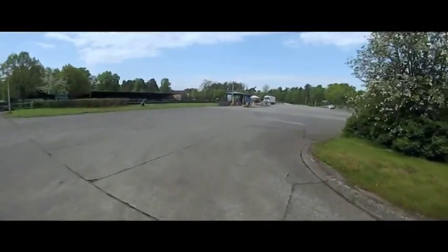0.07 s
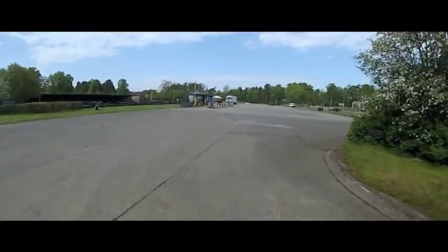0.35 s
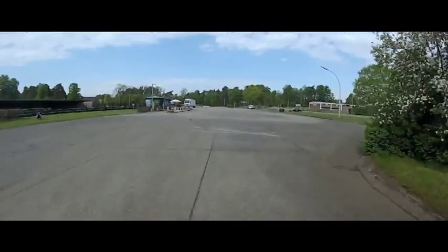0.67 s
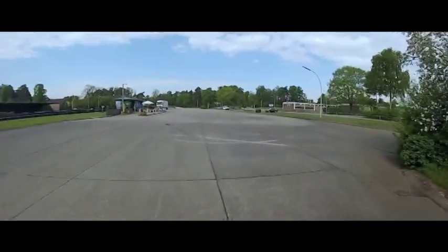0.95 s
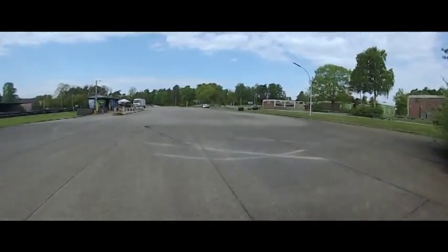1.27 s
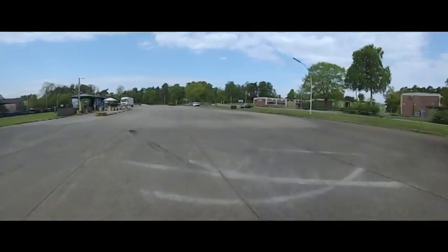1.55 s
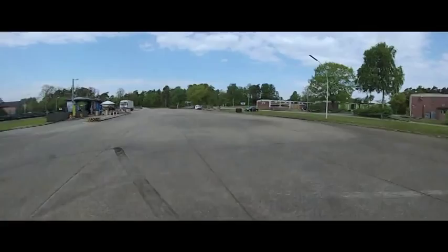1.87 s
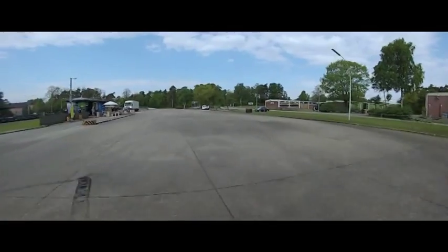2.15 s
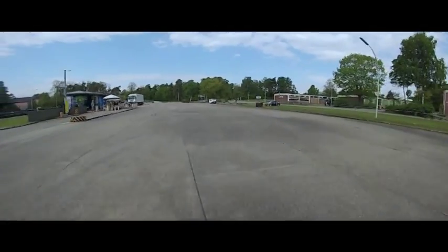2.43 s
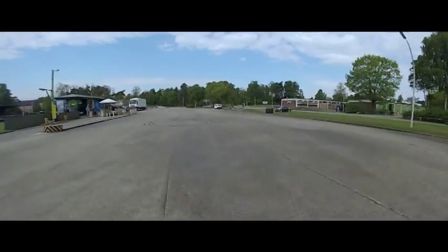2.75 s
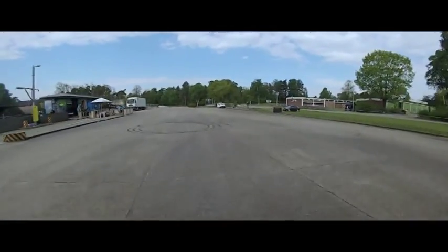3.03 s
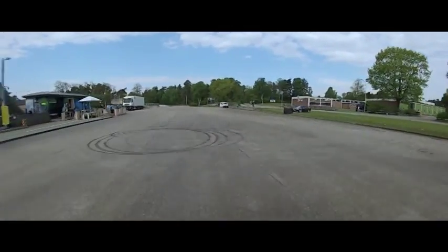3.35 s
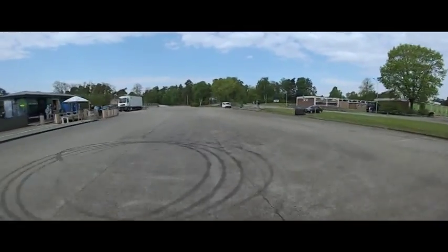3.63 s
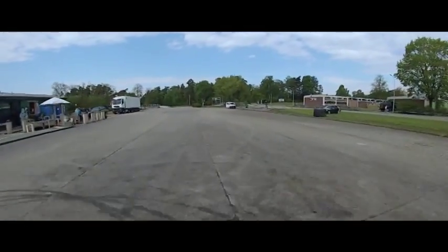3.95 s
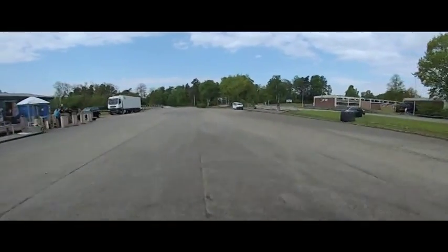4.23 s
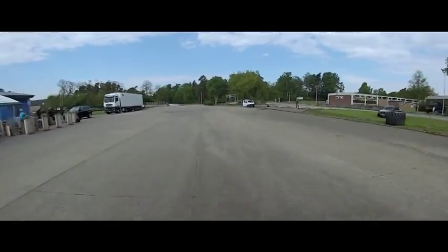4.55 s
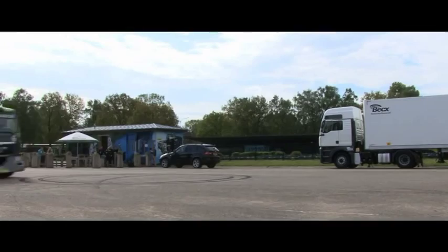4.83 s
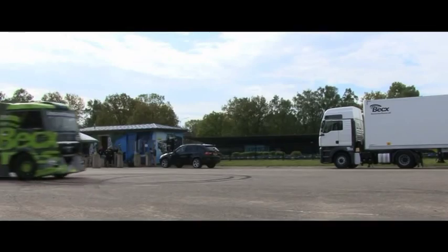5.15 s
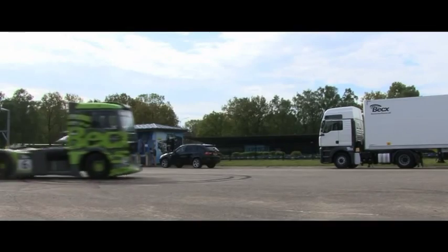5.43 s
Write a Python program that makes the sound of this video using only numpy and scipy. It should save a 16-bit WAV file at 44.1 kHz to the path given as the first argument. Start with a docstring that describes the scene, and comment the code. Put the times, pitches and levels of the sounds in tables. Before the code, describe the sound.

Tyres squeal and scrub as a racing truck slides, its diesel revving under turbo whistle and wind, then it roars past.

```python
"""Racing truck drift and drive-by

A six-cylinder racing truck drifts on tarmac, heard from its cab front, then from the trackside as it
passes. The tyres stick and slip, squealing and scrubbing out of a bend. The diesel pulls through the
gears under a whistling turbocharger, wind buffets the cab, and the loudest swings overload the mic."""
import sys
import numpy as np
from scipy import signal
from scipy.fft import rfft, irfft, next_fast_len
from scipy.io import wavfile

SR = 44100
rng = np.random.default_rng(int(sys.argv[2]) if len(sys.argv) > 2 else 0)


def unload_wav(signal):
    """Save mono or channel-first audio to the path in sys.argv[1] as 16-bit WAV at rate SR, clipped to [-1, 1]."""
    wavfile.write(
        sys.argv[1],
        SR,
        np.round(np.clip(np.atleast_2d(signal).T, -1, 1) * 32767).astype(np.int16),
    )


N = 246690
TIME = np.arange(N) / SR
# Engine load, driving drone, boom, intake and whistle. Each row: time in seconds, dB from full throttle.
LOAD = [(0, -6.5), (.3, -8), (.45, -1.5), (1.25, -2.5), (1.48, -11.5), (1.6, -3), (1.83, -5), (2.0, 0),
        (2.12, -3.5), (2.46, -3.5), (2.5, -16), (2.72, -12), (2.84, -6.5), (3.12, -4), (3.25, .5),
        (4.22, -1.5), (4.33, -10), (4.72, -4)]
# Treble colour of the microphone housing. Each row: centre in Hz, width in Hz, lift in dB.
HOUSING = [(6300, 650, 6), (7860, 320, 8), (8740, 530, -2), (9640, 570, 9), (11420, 760, 9),
           (13300, 500, 6)]


def from_db(db):
    """Decibels to gain."""
    return 10 ** (np.asarray(db) / 20)


def unit_rms(x):
    """Scale to unit power."""
    return x / np.sqrt(np.mean(x ** 2) + 1e-20)


def curves(rows):
    """One curve for each column after the time, one value a sample."""
    times, *columns = np.transpose(rows)
    return [np.interp(TIME, times, column) for column in columns]


def between(start, end, fade=0.044):
    """One inside a span, fading to nothing outside it."""
    return np.clip(1 + np.minimum(TIME - start, end - TIME) / fade, 0, 1)


def during(rows):
    """One while a curve lasts."""
    return between(rows[0][0], rows[-1][0])


def drift(rate):
    """A smooth random wander that changes about rate times a second; rms 1."""
    size = next_fast_len(N)
    hz = np.fft.rfftfreq(size, 1 / SR)
    return unit_rms(irfft(rfft(rng.standard_normal(size)) / (1 + (hz / rate) ** 2) ** 2, size)[:N])


def resonance_db(hz, resonances):
    """The lift that a set of resonances adds at a frequency."""
    return sum(lift_db / (1 + (2 * (hz - centre) / width) ** 2) for centre, width, lift_db in resonances)


def coloured(x, spectrum, resonances=()):
    """Give a sound a colour, lifted at its resonances and falling away below the lowest point; rms 1."""
    size = next_fast_len(N)
    hz = np.fft.rfftfreq(size, 1 / SR) + 1
    points, levels = np.transpose(spectrum)
    db = np.interp(np.log(hz), np.log(points), levels) + resonance_db(hz, resonances)
    gain = from_db(db) / (1 + (points[0] / 2 / hz) ** 4)
    return unit_rms(irfft(rfft(x, size) * gain, size)[:N])


def noise(spectrum, resonances=()):
    """Coloured noise; rms 1."""
    return coloured(rng.standard_normal(N), spectrum, resonances)


def bursts(rows, spectrum, decay_s):
    """Each row sets off a quickly dying burst of one colour."""
    envelope = 0
    for start, db in rows:
        age = np.maximum(TIME - start + 0.0021, 0)
        attack = np.minimum(age / 0.00086, 1)
        envelope += from_db(db) * attack * np.exp(-age / decay_s)
    return envelope * noise(spectrum)


def running_phase(hz):
    """Phase of a frequency curve, from a random start."""
    return 2 * np.pi * np.cumsum(hz) / SR + rng.uniform(0, 2 * np.pi)


def orders(phase, table, uneven_db, smear_rad):
    """Tones at multiples of the firing rate; uneven combustion shakes the level and phase of each."""
    tone = 0
    for multiple, db in table:
        gain = np.sqrt(2) * from_db(db + uneven_db * drift(34.6))
        tone += gain * np.sin(multiple * phase + smear_rad * drift(37) + rng.uniform(0, 2 * np.pi))
    return tone


def engine():
    """Firings drone through the cab's resonances, panels boom, the exhaust barks, the intake hisses."""
    # Three pulls, with a drop after each. Each row: time in seconds, firings per second.
    revs = [(0, 88), (.2, 83), (.36, 77.6), (.52, 73), (1.0, 91), (1.15, 89), (1.35, 99), (1.52, 76),
            (1.9, 89), (2.25, 101.6), (2.55, 84.3), (2.72, 76), (3.25, 86), (3.6, 90.2), (4.05, 108.4),
            (4.16, 104), (4.28, 66.4), (4.75, 80)]
    # The drone in the cab. Each row: multiple of the firing rate, level in dB, share of the load's
    # swing, unevenness in dB, phase smear in radians.
    cab_orders = [(.5, -37.5, 0.28, 11.5, 0.95), (1, -19, .55, 2.5, 0.62), (1.5, -31.5, 0.32, 5, .22),
                  (2, -23, 1, 2.2, 0.16), (2.5, -42, 0.51, 2, 0.16)]
    # Cab resonances that swell a passing order. Each row: centre in Hz, width in Hz, lift in dB.
    cab_modes = [(84.35, 10.7, 7.5), (101, 8.8, 4), (143.7, 17, 6.5), (181.5, 23.3, 11.5)]
    # Open exhaust while the truck is sideways. Each row: time in seconds, level in dB.
    bark_levels = [(0, -57), (.7, -29), (.95, -26), (1.72, -26), (1.85, -49)]
    # The bark's tones. Each row: multiple of the firing rate, relative level in dB.
    bark_orders = [(3, 3), (4, 2.5), (4.5, -4.5), (5, -4), (5.5, -9.5), (6, 1.5)]
    # Colours of exhaust pipe, cab panels and intake. Each row: frequency in Hz, relative level in dB.
    pipe_colour = [(200, -15), (232, -4), (285, -18.5), (325, -11), (370, -0.5), (440, -5), (560, -12)]
    panel_colour = [(40, 8.5), (55, -7), (79, 13.5), (100, -9), (125, 0), (185, -2.5), (215, -12.5),
                    (245, -20.5), (400, -37), (700, -51.5), (1200, -66)]
    intake_colour = [(250, 3.5), (500, -3), (800, -10), (1100, -12), (1300, 1), (2100, 0), (2800, -9.5),
                     (4500, -9.5), (6000, -10.5), (8000, -8.5), (9000, -19.5), (11500, -19), (13500, -21),
                     (15500, -26)]
    # Ringing engine-bay parts. Each row: centre in Hz, width in Hz, lift in dB.
    bay_modes = [(697, 42, 10.5), (1280, 17, 8), (1890, 67, -0.5), (3185, 62, 6.5), (4340, 78, 3.5),
                 (4800, 80.3, 6.5), (5090, 116, 9.5), (5324, 156, 10.5), (6350, 150, 1.5)]
    firing_hz, = curves(revs)
    load_db, = curves(LOAD)
    phase = running_phase(firing_hz * (1 + 0.0045 * drift(10.9)))
    drone = 0
    for multiple, db, share, uneven_db, smear_rad in cab_orders:
        swell = from_db(share * load_db + resonance_db(multiple * firing_hz, cab_modes))
        drone += swell * orders(phase, [(multiple, db)], uneven_db, smear_rad)
    exhaust = coloured(orders(phase, bark_orders, uneven_db=5, smear_rad=0.62), pipe_colour)
    bark = from_db(curves(bark_levels)[0]) * during(bark_levels) * exhaust
    boom = from_db(-16 + 0.21 * load_db) * noise(panel_colour)
    pulse = unit_rms(from_db(0.38 * np.sin(phase) + 0.5 * np.sin(phase / 2) + drift(36)))
    intake_db = -37 + load_db + 2.5 * TIME   # rises as the truck gathers speed
    intake = from_db(intake_db) * pulse * noise(intake_colour, bay_modes)
    throb = from_db(2 * drift(5.9))
    return throb * drone + bark + boom + intake


def tyres():
    """Three tread patches stick and slip at nearby pitches; roughness scatters them and adds screech."""
    # A clean squeal that sags and breaks up. Each row: time in seconds, pitch in Hz, roughness from
    # 0 to 1, relative squeal and scrub levels in dB.
    slide = [(0, 862, 0.32, -19.5, -31.5), (.13, 834.4, 0.24, -16.5, -30.5), (.22, 863.4, 0.41, -21.5, -33),
             (.33, 884.7, 0.23, -31.5, -28), (.41, 736, 0.27, -24.5, -30.5), (.53, 625, .45, -24.5, -29),
             (.62, 654.9, 0.81, -21.5, -29), (1.07, 689.8, .72, -13.5, -28.5),
             (1.33, 697, .8, -16.5, -26.5), (1.5, 714.3, 0.84, -17, -29), (1.6, 733, 0.81, -20, -31),
             (1.75, 729.8, .8, -23.5, -34), (1.9, 725, 0.93, -48, -50)]
    # The tread grabs and the squeal flares. Each row: centre and half length in seconds, lifts of the
    # tone and of the overtones in dB.
    grabs = [(0.003, 0.0057, -2, 13), (0.058, 0.02, 6.5, -2), (.157, 0.03, -4.5, 14.5),
             (0.345, 0.034, 10.5, 11), (0.435, 0.072, 7.5, 10.5), (1.248, 0.014, 6, 6.5),
             (1.329, 0.021, 6.5, 0.5), (1.379, 0.022, 5, 2.5), (1.488, .026, 6.5, 1), (1.66, .025, 6, -5)]
    # The screech. Each row: multiple of the pitch, level in dB before the slope.
    overtones = [(2, -1.5), (3, -2.5), (4, -5.5), (5, -4)]
    # Tread blocks snap loose. Each row: start in seconds, relative level in dB.
    snaps = [(.379, 1.5), (.456, -5), (.514, -0.5), (.54, -15), (.567, -6), (.594, -3), (.618, -23),
             (.629, -3), (.662, -8), (.697, -12)]
    # Colours of rubber tearing over tarmac and of the snaps. Each row: frequency in Hz, relative dB.
    scrub_colour = [(250, -6), (350, -15.5), (520, -15), (800, -2.5), (1050, -10), (1350, -10.5),
                    (1700, -8.5), (2200, -11), (3100, -18.5), (5200, -20.5), (7000, -37), (11400, -42.5),
                    (13500, -47), (15500, -60)]
    snap_colour = [(1200, -12), (2000, -7), (2450, 14.5), (2900, -9), (4800, -3), (7000, -50), (15000, -55)]
    slope_db = -6   # per overtone, pivoting on the third harmonic
    hz, roughness, squeal_db, scrub_db = curves(slide)
    screech_db = scrub_db - 4.5 + 14 * roughness
    for centre, half_length, tone_db, overtone_db in grabs:
        flare = np.exp(-((TIME - centre) / half_length) ** 2)
        squeal_db += tone_db * flare
        screech_db += overtone_db * flare
    squeal = screech = 0
    for detune, patch_db in [(0, -3), (-0.09, -12.5), (0.15, -7.5)]:
        scatter = detune + 0.042 * drift(21.76) + 0.045 * drift(269)
        phase = running_phase(hz * (1 + roughness * scatter))
        grip = from_db(patch_db + 2.3 * drift(45))
        squeal += grip * np.sin(phase)
        for k, db in overtones:
            screech += grip * from_db(db + (k - 3) * slope_db + 3.2 * drift(60)) * np.sin(k * phase)
    scrub = from_db(scrub_db + 8.5 + 1.46 * drift(91)) * noise(scrub_colour, HOUSING)
    chatter = from_db(-13) * bursts(snaps, snap_colour, decay_s=0.012)
    sliding = from_db(squeal_db + 3.5) * squeal + from_db(screech_db) * screech + scrub
    return sliding * during(slide) + chatter


def wind():
    """Eddies shed from the cab front at a wandering rate and strength, and rock the microphone."""
    # Strength of the buffeting. Each row: time in seconds, relative level in dB.
    buffet = [(0, -17), (.15, -9), (2.8, -12), (3.5, -16.5), (3.8, -9), (4.45, -9.5), (4.55, -13.5),
              (4.85, -15.5), (5.1, -49)]
    shedding_hz = 23.68 * (1 + 0.16 * drift(14))
    phase = running_phase(shedding_hz)
    return from_db(curves(buffet)[0] + 4.5 + 0.28 * drift(19)) * np.sin(phase) * during(buffet)


def ride():
    """Tyres roll, loose fittings rattle, and the mic thumps and crackles, overloaded by low swings."""
    # Microphone overloads and knocks of the fittings. Each row: start in seconds, relative level in dB.
    overloads = [(1.961, -13), (2.04, -12), (2.058, -10), (2.478, -13), (3.251, -14), (3.32, -13.5),
                 (3.434, -13)]
    knocks = [(2.484, -35), (2.533, -38), (2.63, -36), (2.737, -34), (2.768, -47)]
    # Colours of rolling tyres, overloads and fittings. Each row: frequency in Hz, relative level in dB.
    rolling_colour = [(250, 6), (700, 6), (1100, -11.5), (2500, -55), (6000, -27), (15000, -40)]
    overload_colour = [(200, 6.5), (380, 7), (550, -14), (900, -9.5), (2000, -55)]
    fitting_colour = [(600, -9), (1050, 2), (1500, -4), (2500, -6), (3500, -19), (9000, -30)]
    overload_thumps = from_db(-5.5) * bursts(overloads, overload_colour, decay_s=0.0054)
    rattles = bursts(knocks, fitting_colour, decay_s=0.0059)
    return from_db(-47.5) * noise(rolling_colour) + overload_thumps + rattles


def puffs():
    """Brief bright hisses during the slide."""
    # The puffs. Each row: start and end in seconds, level in dB.
    spans = [(0.063, 0.117, -28), (0.197, 0.322, -31.5), (1.417, 1.556, -30.5)]
    # Their colour. Each row: frequency in Hz, relative level in dB.
    puff_colour = [(2500, 6), (4500, 12), (8000, -3), (11500, -5), (15500, -16)]
    envelope = sum(from_db(db) * between(start, end, fade=0.03) for start, end, db in spans)
    return envelope * noise(puff_colour, HOUSING)


def turbo():
    """Compressor blades whistle, louder under load; turbulence adds a skirt of hiss around the tone."""
    # Turbocharger speed. Each row: time in seconds, whistle pitch in Hz.
    pitch = [(1.7, 5900), (1.86, 6470), (2.0, 7003), (2.15, 7680), (2.26, 8050), (2.4, 7350), (2.52, 7100),
             (2.62, 7100), (2.78, 6860), (3.1, 6990), (3.45, 7440), (3.6, 7622), (3.69, 7970), (3.86, 8760),
             (4.08, 9540), (4.25, 8240), (4.6, 6673), (4.82, 6080)]
    # Intake duct resonances that flare the whistle. Each row: centre in Hz, width in Hz, lift in dB.
    duct_modes = [(6504, 72, 12.5), (6630, 194, 11.5), (7370, 35, 7.5), (7650, 130, 13.5), (8120, 520, 9),
                  (7680, 70, 5.5), (8100, 69, 3), (8300, 91, 2), (9325, 130, 6)]
    # Faint rising whistles as boost builds. Each row: start and end in seconds, first and last pitch
    # in Hz, level in dB.
    spool_ups = [(0.325, 0.522, 3500, 3780, -37), (0.726, 1.119, 3842, 5000, -32.5),
                 (0.979, 1.124, 5166, 5620, -36), (1.3, 1.614, 5598, 6763, -42),
                 (1.09, 1.875, 6300, 9894, -45.5), (3.469, 3.578, 2766, 3460, -37)]
    hz, = curves(pitch)
    load_db, = curves(LOAD)
    full_throttle_db = -46.5 + 2.5 * TIME   # rises as the truck gathers speed
    db = full_throttle_db + 0.67 * load_db + resonance_db(hz, duct_modes)
    phase = running_phase(hz * (1 + 0.00309 * drift(250)))
    blades = from_db(db + 2.7 * drift(86) + 1.8 * drift(23)) * np.sin(phase)
    octave = from_db(0.5 * db - 37 + 2.93 * drift(120)) * np.sin(2 * phase + 0.81 * drift(500))
    skirt = from_db(0.63 * db - 18.5) * (drift(503) * np.sin(phase) + drift(615) * np.cos(phase))
    whistle = (blades + octave + skirt) * during(pitch)
    for start, end, from_hz, to_hz, level_db in spool_ups:
        progress = np.clip((TIME - start) / (end - start), 0, 1)
        glide_hz = from_hz * (to_hz / from_hz) ** progress
        swell = from_db(level_db + 4.54 * drift(50.34)) * np.abs(np.sin(np.pi * progress)) ** 0.5
        whistle += swell * np.sin(running_phase(glide_hz * (1 + 0.02 * drift(386.8))))
    return whistle


def drive_by():
    """A clean exhaust note under the pulsing roar of engine and tyres, which swells with nearness."""
    # The exhaust from the trackside. Each row: time in seconds, firings per second, level in dB.
    note = [(4.78, 64, -24.5), (4.85, 64.5, -18.5), (4.95, 64.9, -16.5), (5.12, 63.5, -16),
            (5.28, 65, -12.5), (5.42, 64, -16), (5.5, 60, -25.5), (5.59, 66.5, -18.5)]
    # Its tones. Each row: multiple of the firing rate, relative level in dB.
    note_orders = [(1, -24), (2, -11), (3, -1), (4.5, -23), (7, -16.5)]
    # Colours of the roar and the close-up hiss. Each row: frequency in Hz, relative level in dB.
    roar_colour = [(110, -8.5), (170, -8), (280, 0), (370, -4.5), (600, -4.5), (800, 2), (1000, -1),
                   (1600, -7), (2250, -4.5), (3300, -12), (4400, -14.5), (6500, -23.5), (8500, -33.5),
                   (11500, -36.5), (15500, -52)]
    hiss_colour = [(1800, -3), (2300, 9.5), (3200, -23), (4400, 2), (6000, -17), (8500, -28), (15500, -45)]
    # Peaks in the roar. Each row: centre in Hz, width in Hz, lift in dB.
    roar_peaks = [(455, 38.5, 1.8), (984, 115, 4.9), (2150, 410, 2.6), (4280, 330, 3.9)]
    closest_s, distance_m, speed_m_per_s = 5.332, 3.77, 13.3
    firing_hz, exhaust_db = curves(note)
    nearness = distance_m / np.hypot(distance_m, speed_m_per_s * (TIME - closest_s))
    phase = running_phase(firing_hz)
    exhaust = from_db(exhaust_db) * orders(phase, note_orders, uneven_db=0, smear_rad=0.051)
    pulse = unit_rms(from_db(0.81 * np.sin(phase) + 0.46 * drift(90)))
    roar = from_db(-12) * nearness * noise(roar_colour, roar_peaks + HOUSING)
    hiss = from_db(-20) * nearness ** 3 * noise(hiss_colour)   # the hiss carries less far
    fade_in = from_db(69 * np.minimum(TIME - 4.825, 0))   # 69 dB a second, fully up at 4.825 s
    return exhaust * during(note) + pulse * (roar + hiss) * fade_in


def scene():
    """The ride on the cab front gives way to the trackside."""
    fade_out = from_db(-115 * np.maximum(TIME - 4.73, 0))   # 115 dB a second from 4.73 s
    on_board = fade_out * (engine() + turbo() + ride())
    return (on_board + tyres() + puffs() + wind() + drive_by())[None]


def record(dry):
    """The microphone is linear until near full scale, where peaks flatten; the top is cut."""
    cutoff_hz = 15450
    clipped = dry / (1 + dry ** 16) ** (1 / 16)
    return signal.sosfilt(signal.ellip(12, 0.1, 90, cutoff_hz, fs=SR, output="sos"), clipped)


dry = scene()
out = record(dry)
unload_wav(out)
```